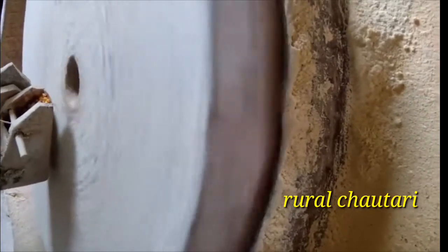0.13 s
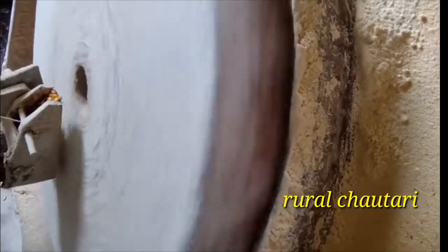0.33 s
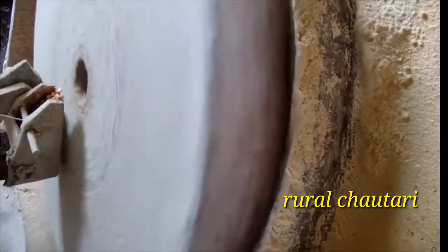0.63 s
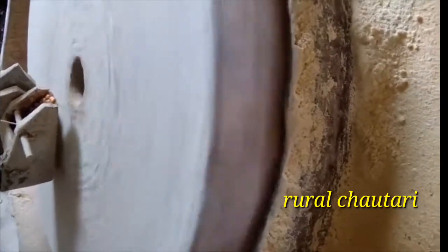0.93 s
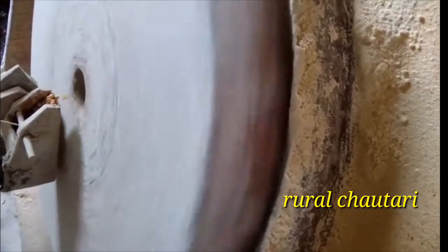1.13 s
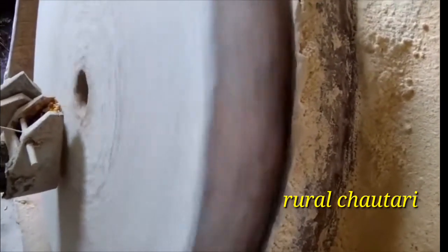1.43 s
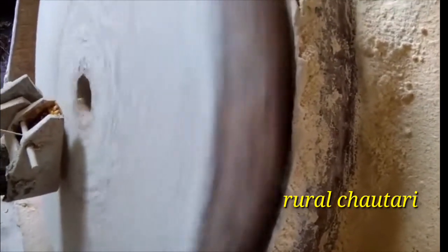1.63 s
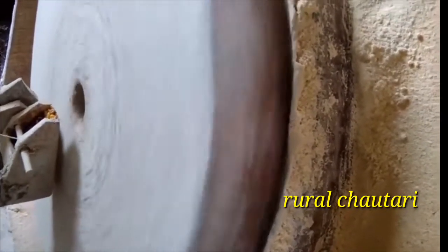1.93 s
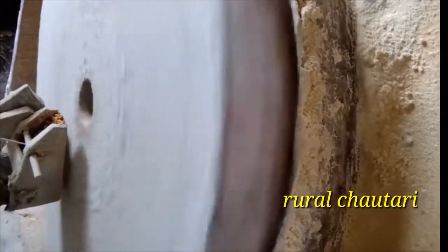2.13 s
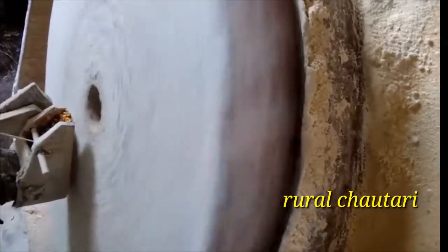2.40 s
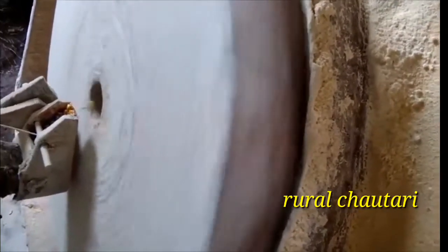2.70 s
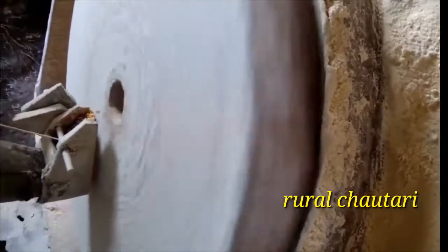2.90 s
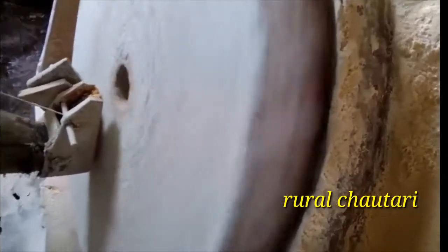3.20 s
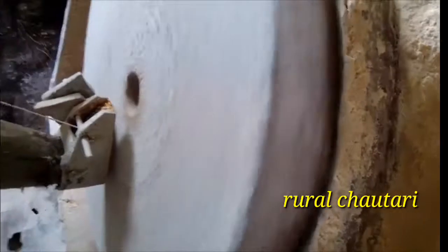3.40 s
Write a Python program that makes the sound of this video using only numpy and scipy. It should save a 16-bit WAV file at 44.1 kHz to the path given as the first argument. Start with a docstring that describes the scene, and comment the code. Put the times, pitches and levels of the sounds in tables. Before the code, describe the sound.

Water-driven millstone grinding grain, low rumble and water rush, with sharp irregular wooden knocks

```python
"""A water mill's runner stone turns in a small plastered room: shaped noise makes the rumble of stone on stone.
Dense random clicks make the crushed grain, and steady shaped noise makes the water rushing below.
The wooden clapper that shakes the feed chute rides on the stone: decaying tones and short noise bursts
make its uneven knocks, their strong echoes and the light chatter in between.
Knocks and grain reach the right microphone first; the left one is duller."""
import sys
import numpy as np
from scipy import signal
from scipy.fft import rfft, irfft, next_fast_len
from scipy.io import wavfile
from scipy.ndimage import map_coordinates

SR = 44100
rng = np.random.default_rng(int(sys.argv[2]) if len(sys.argv) > 2 else 0)


def to_wav(s):
    """Save 16-bit WAV."""
    ch = np.atleast_2d(s).T  # columns
    pcm = np.round(np.clip(ch, -1, 1) * 32767)  # PCM
    wavfile.write(sys.argv[1], SR, pcm.astype(np.int16))


N = 156555  # length of the scene in samples


def amp(db):
    """Turn decibels into a plain multiplier."""
    return 10 ** (np.asarray(db) / 20)


def unit(x):
    """Scale x to an rms of 1."""
    return x / np.sqrt(np.mean(x ** 2) + 1e-20)


def along(points, hz):
    """Read a curve of (pitch_hz, value) points, joined by straight lines on a log pitch axis."""
    point_hz, values = np.transpose(points)
    return np.interp(np.log(hz + 1), np.log(point_hz + 1), values)


def wobble(rate):
    """A smooth random curve through `rate` random points a second."""
    return map_coordinates(rng.standard_normal(1000), [np.arange(N) * rate / SR], mode="wrap")


def filtered(x, response):
    """Multiply the spectrum of x by a response, a function of frequency in Hz."""
    size = next_fast_len(N + SR // 2)
    hz = np.fft.rfftfreq(size, 1 / SR)
    return irfft(rfft(x, size) * response(hz), size)[..., :N]


def coloured(x, points):
    """Shape the tone of x by (pitch_hz, level_db) points, with a filter that never sounds early."""
    size = 2048
    level = amp(along(points, np.fft.rfftfreq(size, 1 / SR)))
    # Folding the cepstrum forward in time gives the minimum-phase filter.
    cepstrum = irfft(np.log(level))
    cepstrum[1:size // 2] *= 2
    cepstrum[size // 2 + 1:] = 0
    impulse = irfft(np.exp(rfft(cepstrum)))
    return signal.fftconvolve(x, impulse)[:len(x)]


# How alike a wide sound is at left and right: pitch_hz, likeness (1 same, 0 unrelated)
LIKENESS = [(60, .995), (110, .99), (170, .95), (290, .7), (490, .74), (830, .42), (1410, -.08),
            (2400, -.06), (4000, 0)]


def spread(pair, response):
    """Mix two unrelated noises into left and right, alike in the bass and unrelated in the treble, at rms 1."""
    def mid_and_side(hz):
        angle = np.arccos(np.clip(along(LIKENESS, hz), -1, 1)) / 2
        return response(hz) * np.array([np.cos(angle), np.sin(angle)])

    mid, side = filtered(pair, mid_and_side)
    return unit(np.array([mid + side, mid - side]))


def add(track, start_s, sound):
    """Lay a sound on the track from start_s seconds."""
    part = track[..., max(round(start_s * SR), 0):][..., :sound.shape[-1]]
    part += sound[..., :part.shape[-1]]


# How long the room rings on at each pitch: pitch_hz, time_to_fall_60_db_s
ROOM_DECAY = [(200, 0.16), (1300, 0.2), (2700, 0.28), (5000, 0.25), (10000, 0.058)]
# Early echoes off the walls, before each is shifted slightly at random: delay_s, level_db
WALL_ECHOES = [(.0042, -3), (.0075, -3), (0.0135, -8), (0.016, -11), (0.024, -12.5)]
ROOM_DB, ROOM_BUILD_S, LEFT_LAG_S = -1.5, 0.0027, 0.00026


def in_room(x, wet_db=0):
    """Place a sound in the room: direct sound, separate wall echoes, then a tail of decaying noise."""
    hz, t, noise = signal.stft(rng.standard_normal((2, SR // 4)), SR, nperseg=256)
    decay = amp(-60 * t / along(ROOM_DECAY, hz)[:, None])
    build = 1 - np.exp(-t / ROOM_BUILD_S)
    tail = signal.istft(noise * decay * build, SR, nperseg=256)[1]
    answer = amp(ROOM_DB + wet_db) * tail / np.linalg.norm(tail[0])
    # The direct sound reaches the right side first.
    answer[0, round(LEFT_LAG_S * SR)] += 1
    answer[1, 0] += 1
    for delay_s, level_db in WALL_ECHOES:
        arrival_s = delay_s + rng.normal(0, .0003, 2)  # a little different at each side
        answer[[0, 1], np.abs(arrival_s * SR).astype(int)] += amp(level_db + wet_db)
    return signal.fftconvolve(x[None], answer, axes=1)


# Tone of the rumble, before it is set to rms 1: pitch_hz, level_db (per Hz)
RUMBLE_TONE = [(20, -16), (33, -15.5), (46, -29), (65, -13), (100, -4.5), (170, -1.5), (250, -3), (330, -7),
               (600, -17.5), (1500, -20), (5000, -78)]
# Resonances of stones, casing and chute, relative to each other: pitch_hz, width_hz, level_db
STONE_MODES = [(95, 21, -29), (139.9, 5.1, 0), (245, 17, -4), (316, 43, -15.5), (431.3, 35, -8.5),
               (544.8, 12.8, -4.5), (594.3, 26, -7), (661.8, 12.2, -1), (782, 45, -18), (943.5, 58, -10),
               (1126, 16, -8.5), (2418, 15, -13), (2678, 21, -12)]
# How the rumble swells and sinks; its average is taken off: time_s, level_db
DRAG_LEVEL = [(0.0, -32), (0.72, -36.5), (1.41, -33.5), (1.44, -28.5), (1.538, -35.5), (3.39, -32)]
RUMBLE_DB, STONES_DB = -35.5, -34


def millstones():
    """Stone drags over stone: a broad rumble and the resonances that it stirs."""
    def resonances(hz):
        total = 0
        for k, (pitch_hz, width_hz, level_db) in enumerate(STONE_MODES):
            damping = 1j * hz * width_hz
            mode = damping / (pitch_hz * pitch_hz - hz * hz + damping)
            total = total + (-1) ** k * amp(level_db) * mode  # neighbours have opposite signs
        return total

    drag_db = np.interp(np.arange(N) / SR, *np.transpose(DRAG_LEVEL))
    rumble = spread(rng.standard_normal((2, N)), lambda hz: amp(along(RUMBLE_TONE, hz)))
    ring = spread(rng.standard_normal((2, N)), resonances)
    rumble_db = RUMBLE_DB + drag_db - drag_db.mean() + 0.91 * wobble(19)
    ring_db = STONES_DB + 0.23 * wobble(8.16)
    return amp(rumble_db) * rumble + amp(ring_db) * ring


# Tone of the cracking grain, before it is set to rms 1: pitch_hz, level_db (per Hz)
GRIT_TONE = [(40, -49), (150, -35), (300, -3), (600, -1), (1100, -4.5), (2000, -2), (2650, -13.5),
             (3200, -18), (6000, -8.5), (12000, -15)]
GRIT_DB, GRAINS_PER_S, GRAIN_SPREAD_DB = -38, 700, 6


def grit():
    """Grain cracks densely between the stones: random clicks of uneven strength, heard in the room."""
    happens = rng.random(N) < GRAINS_PER_S / SR
    direction = rng.choice([-1, 1], N)
    cracks = happens * direction * amp(GRAIN_SPREAD_DB * rng.standard_normal(N))
    heard = in_room(coloured(cracks, GRIT_TONE))[:, :N]
    return amp(GRIT_DB + 3.0 * wobble(17)) * unit(heard)


# Tone of the rushing water, before it is set to rms 1: pitch_hz, level_db (per Hz)
WATER_TONE = [(100, -7), (350, -5.5), (600, 9), (1000, 1.5), (1500, -1.5), (2100, -4), (2650, -8.5),
              (3100, -4.5), (4200, -4), (5200, -4), (6500, -10.5), (14000, -15)]
WATER_DB = -32


def water():
    """The mill race rushes steadily: wide, shaped noise with a very slight wobble in level."""
    rush = spread(rng.standard_normal((2, N)), lambda hz: amp(along(WATER_TONE, hz)))
    return amp(WATER_DB + 0.08 * wobble(7.15)) * rush


# The clapper's ringing modes, typical values that vary by blow: pitch_hz, level_db, time_to_fall_60_db_s
WOOD_MODES = [(1248, -20, 0.085), (1720, -21, 0.022), (2596, -10.5, 0.036), (2686, -8.5, 0.047),
              (3350, -16.5, 0.038)]
# A mode whose share depends on where the wood is struck: pitch_hz, level_db, time_to_fall_60_db_s
STRIKE_PLACE_MODE = (2425, -10.5, 0.033)
# Modes that only hard blows ring, beating with their neighbours: pitch_hz, level_db, time_to_fall_60_db_s
HARD_BLOW_MODES = [(4530, -4, 0.07), (4600, -6, 0.055), (2790, -12, 0.09)]
# Tone of the dull body of a knock, before it is set to equal energy: pitch_hz, level_db
BODY_TONE = [(30, -66), (200, -42), (450, -5.5), (900, 6), (1300, 5), (1700, 0), (2400, 0), (4000, -33.5),
             (9000, -75)]
# Tone of the crack of a knock, before it is set to equal energy: pitch_hz, level_db
CRACK_TONE = [(30, -85), (300, -48), (1000, -14), (2000, -12), (3000, 9), (3600, 8.5), (5000, 11.5),
              (6200, 4.5), (7500, 1.5), (9000, -12), (14000, 0)]
RING_DB, BODY_DB, CRACK_DB = 0.5, 9.5, 7.5
RING_ROOM_DB, CRACK_ROOM_DB = -7, -4  # ring and crack are heard more directly than the dull body
DETUNE = 0.0031  # share by which each mode's pitch varies from blow to blow
HARD_DB, HARD_GROWS = -1, 2.2  # strength of a hard blow; extra dB of its modes per dB of strength
SCUFF_DB, SCUFF_T60_S = -10, .009  # the brief scrape that follows each contact


def ringing(modes, t):
    """Add up fading sine tones, each slightly varied in level and pitch."""
    total = 0
    for pitch_hz, level_db, t60_s in modes:
        fade = amp(level_db + rng.normal(0, 1) - 60 * t / t60_s)
        total = total + fade * np.sin(2 * np.pi * pitch_hz * rng.normal(1, DETUNE) * t)
    return total


def knock(strength_db, low_db, body_db, crack_db):
    """One blow of wood on stone: ringing modes, plus a click and scrape shaped into a dull body and a crack."""
    t = np.arange(SR // 10) / SR
    hard_db = HARD_GROWS * (strength_db - HARD_DB)
    ring = ringing(WOOD_MODES, t)
    ring = ring + amp(low_db) * ringing([STRIKE_PLACE_MODE], t)
    ring = ring + amp(hard_db) * ringing(HARD_BLOW_MODES, t)

    scuff = amp(SCUFF_DB - 60 * t / SCUFF_T60_S) * rng.standard_normal(len(t))
    contact = (t == 0) + scuff
    body = coloured(contact, BODY_TONE)
    crack = coloured(contact, CRACK_TONE)
    body = body / np.linalg.norm(body)
    crack = crack / np.linalg.norm(crack)

    blow = amp(RING_DB) * in_room(ring, RING_ROOM_DB)
    blow += amp(BODY_DB + body_db) * in_room(body)
    blow += amp(CRACK_DB + crack_db) * in_room(crack, CRACK_ROOM_DB)
    return amp(strength_db) * blow


# Knocks, and strong wall echoes some 13 ms after several of them; the last three levels add to the strength:
# start_s, strength_db, low_mode_db, body_db, crack_db
CLAPPER_KNOCKS = [(0.0437, -20.5, 3, 3, 11), (0.1326, -25, 3, 10.5, 6), (0.2333, -17.5, 2, 4, 6.5),
                  (0.2454, -17.5, -6, -3, -2), (0.3411, -10.5, 2, -3, 4.5), (0.3473, -17.5, 1, 8.5, 10),
                  (0.4799, -4.5, 1.5, -3.5, 3.5), (0.4924, -18.5, 4, 4, 2), (0.511, -16.5, 0, -1, -8),
                  (0.6486, -20.5, -4.5, 9, 11.5), (0.6617, -15, -12, -8, -17), (0.7215, -19.5, 0, 4, -14),
                  (0.7750, -24, -7, -7, -11), (0.8311, -24.5, -7, 5.5, 10), (0.8426, -16, -15, -5, -12),
                  (0.941, -26, 11, 10, -2), (0.9810, -27.5, 11.5, 7, -6), (1.191, -25.5, -3, 2, -9),
                  (1.2395, -26, -3, 3, -2), (1.3011, -17.5, 8, 3, 3), (1.4094, -19.5, 3, 3, 3),
                  (1.4222, -23, -12, -4, -2), (1.7774, -24.5, -7, 9, 2), (1.97, -27.5, 0, 11, 2),
                  (2.1308, -25.5, 6, 7.5, 7), (2.225, -26, -5, -5, -2), (2.364, -24, -8, 8, 11),
                  (2.375, -19.5, -12, -13, -13), (2.4674, -23, -3, 10, 17), (2.476, -19.5, -8, 6, 2.5),
                  (2.668, -28, -6, 7, 2), (2.797, -26.5, -3, 11, 3), (2.872, -27, -4, -8, -4),
                  (2.959, -26, -8, -1, 3), (2.991, -27, -8, -5, 9), (3.081, -12, -14, -0.5, 5.5),
                  (3.093, -16, -12, -8, -4)]
CHATTER_PER_S, CHATTER_DB, CHATTER_SPREAD_DB = 16, -37, 2


def clapper():
    """The clapper rides on the stone: knocks and their strong echoes at set times, light taps at random."""
    out = np.zeros((2, N))
    for start_s, *blow in CLAPPER_KNOCKS:
        add(out, start_s, knock(*blow))
    # One tap falls somewhere in each equal slice of time.
    for k in range(int(CHATTER_PER_S * N / SR)):
        strength_db = rng.normal(CHATTER_DB, CHATTER_SPREAD_DB)
        tap = knock(strength_db, rng.normal(0, 3), body_db=-8, crack_db=3.5)
        add(out, (k + rng.random()) / CHATTER_PER_S, tap)
    return out


def scene():
    """The whole mill: stones, grain, water and clapper together."""
    return millstones() + grit() + water() + clapper()


# Tone of the left microphone: pitch_hz, level_db
LEFT_MIC_TONE = [(150, -.3), (280, 0), (450, -2.5), (750, -4), (1100, -1), (1600, 1), (2500, 1.5),
                 (3200, -3), (4000, -10), (5300, -13), (7000, -11), (8500, -4)]
# Treble roll-off of the whole sound: pitch_hz, level_db
TREBLE_TONE = [(5500, 0.5), (6600, -2.5), (7000, -10.5), (7400, -12), (7900, -29.5), (8600, -17),
               (14000, -27)]
TOP_HZ = 14500


def record(dry):
    """Dull the left microphone, roll off the treble of both channels, and remove all from TOP_HZ up."""
    left = coloured(coloured(dry[0], LEFT_MIC_TONE), TREBLE_TONE)
    right = coloured(dry[1], TREBLE_TONE)
    return filtered(np.array([left, right]), lambda hz: hz < TOP_HZ)


dry = scene()
out = record(dry)
to_wav(out)
```